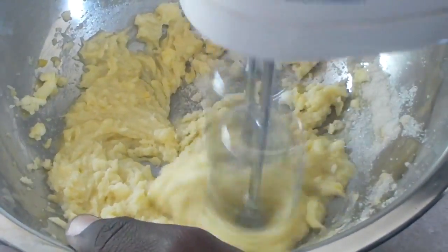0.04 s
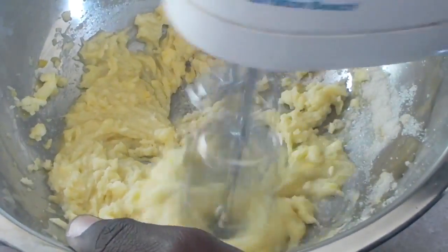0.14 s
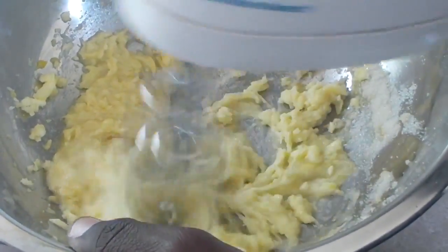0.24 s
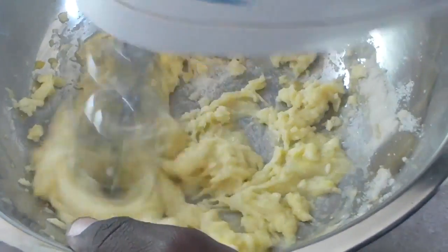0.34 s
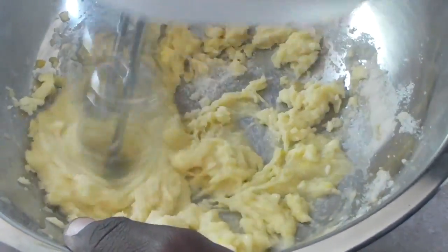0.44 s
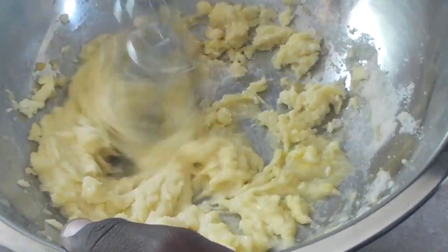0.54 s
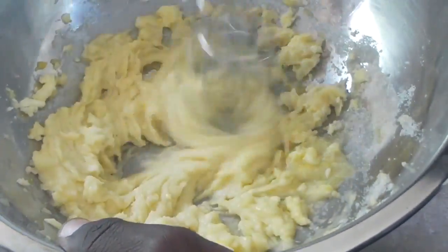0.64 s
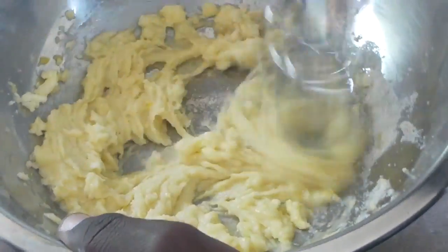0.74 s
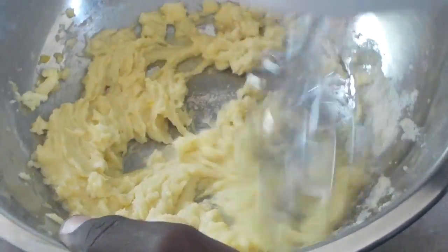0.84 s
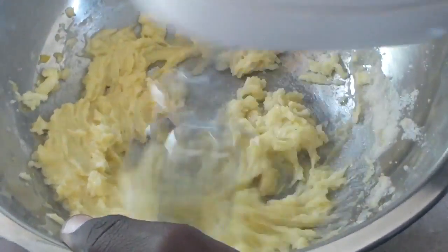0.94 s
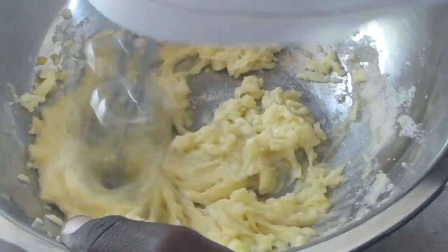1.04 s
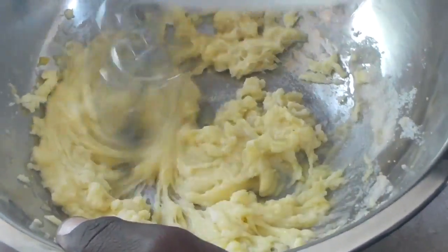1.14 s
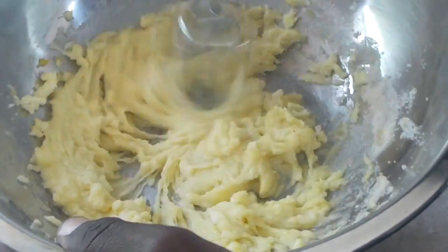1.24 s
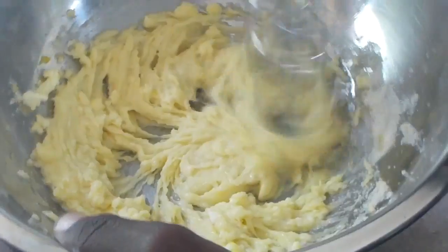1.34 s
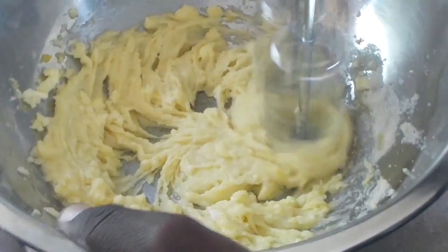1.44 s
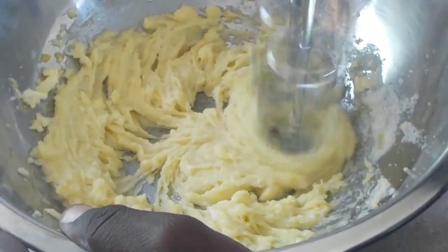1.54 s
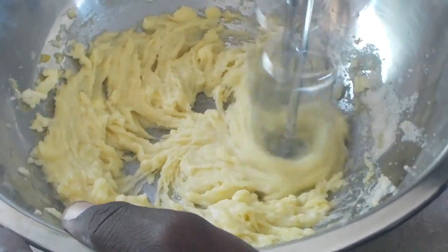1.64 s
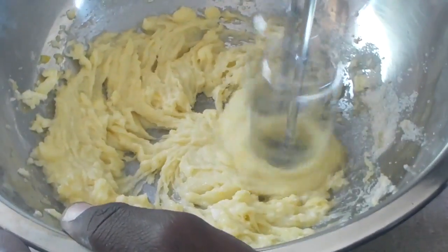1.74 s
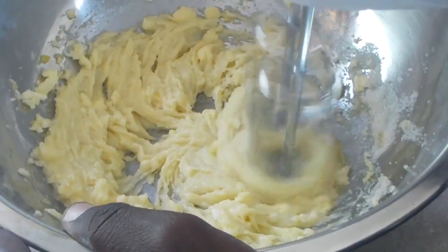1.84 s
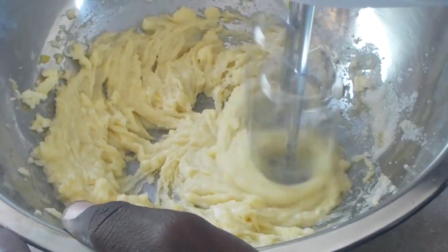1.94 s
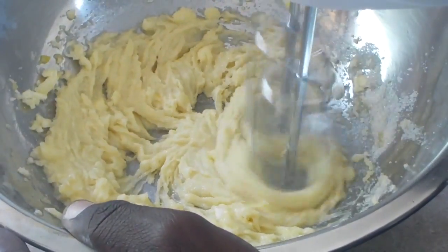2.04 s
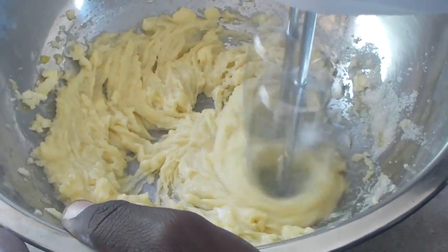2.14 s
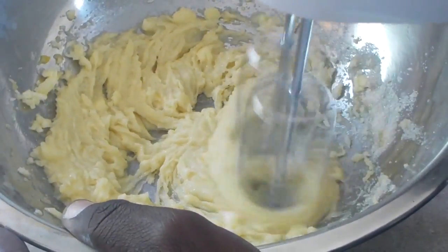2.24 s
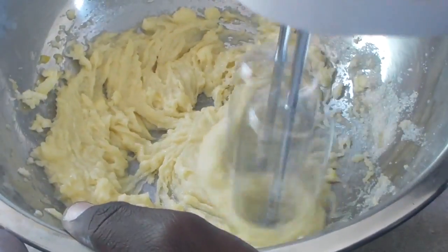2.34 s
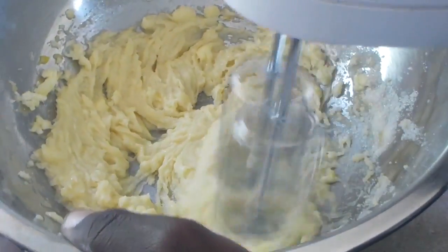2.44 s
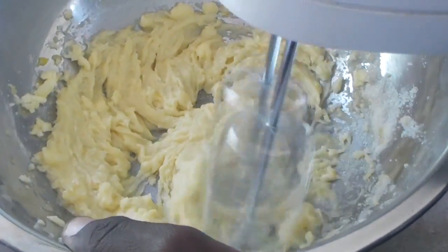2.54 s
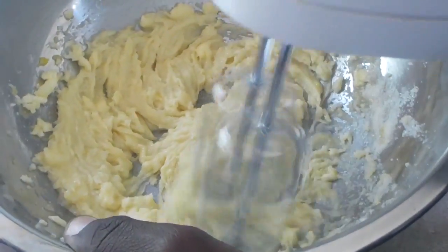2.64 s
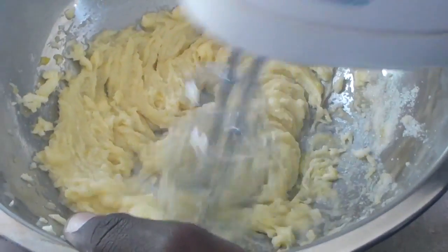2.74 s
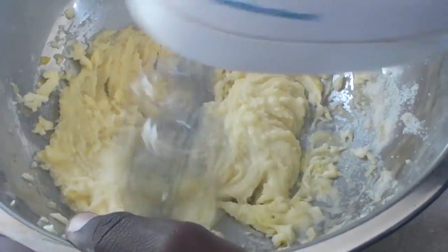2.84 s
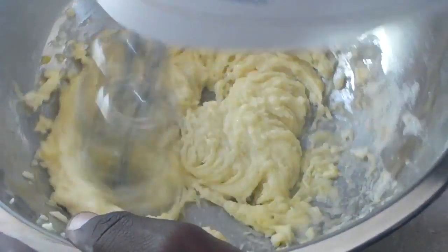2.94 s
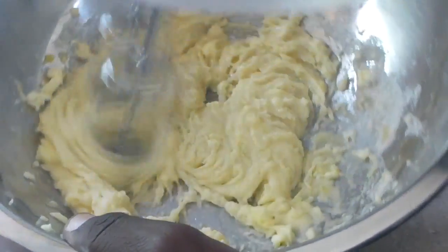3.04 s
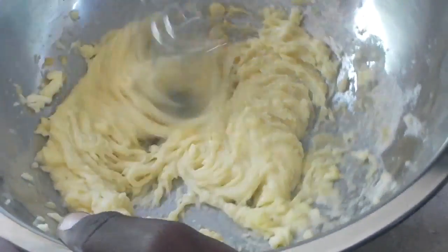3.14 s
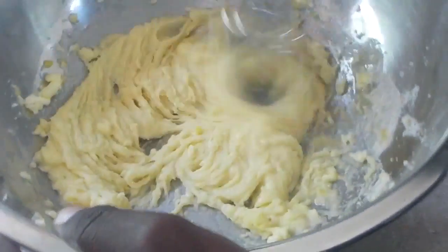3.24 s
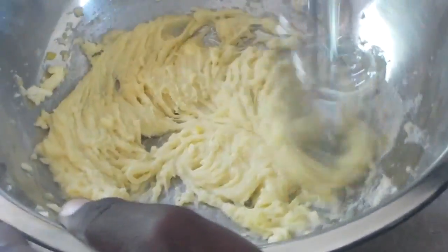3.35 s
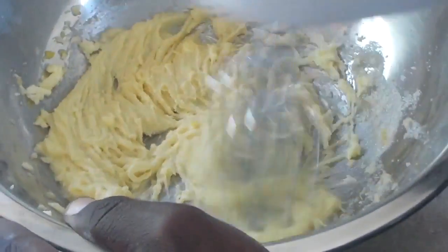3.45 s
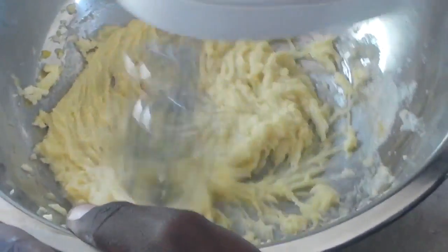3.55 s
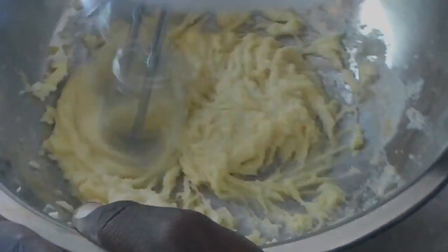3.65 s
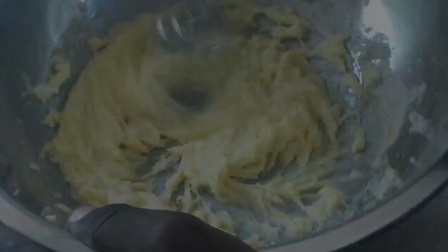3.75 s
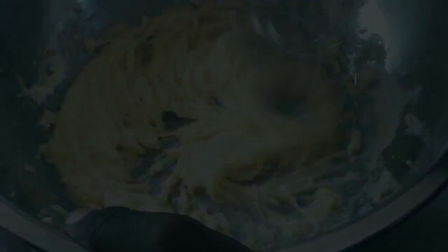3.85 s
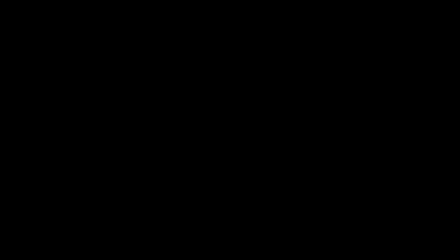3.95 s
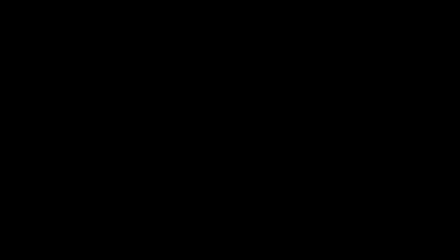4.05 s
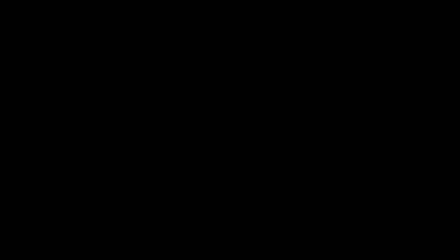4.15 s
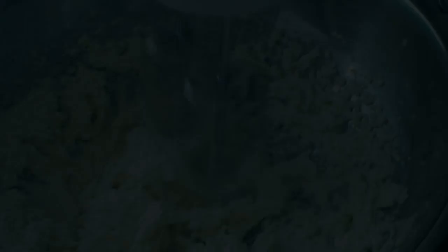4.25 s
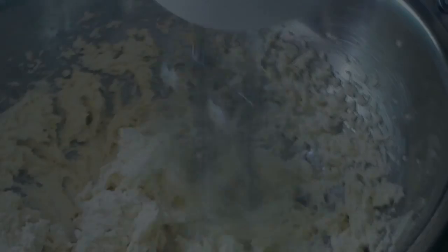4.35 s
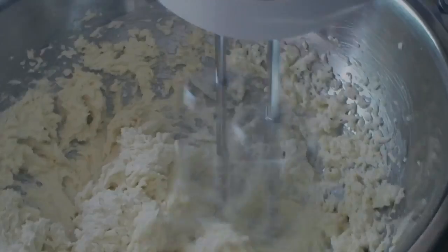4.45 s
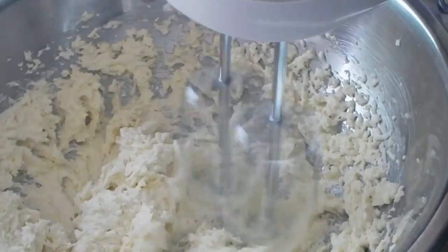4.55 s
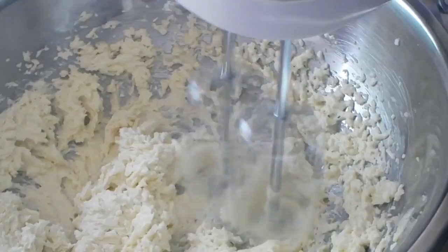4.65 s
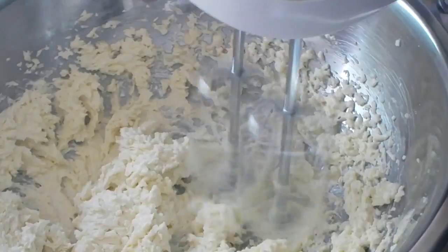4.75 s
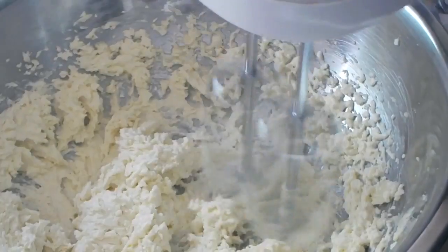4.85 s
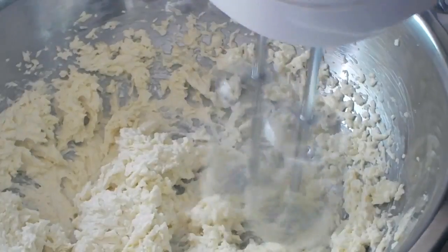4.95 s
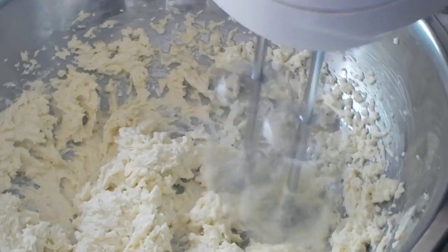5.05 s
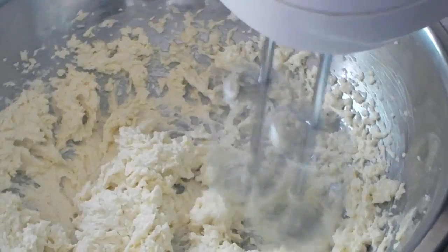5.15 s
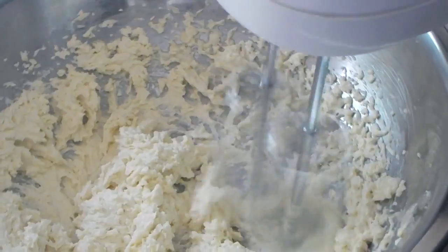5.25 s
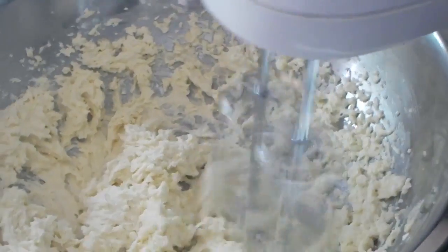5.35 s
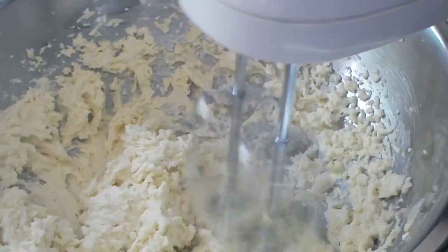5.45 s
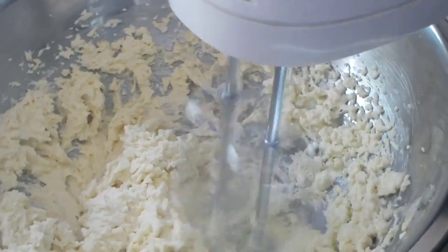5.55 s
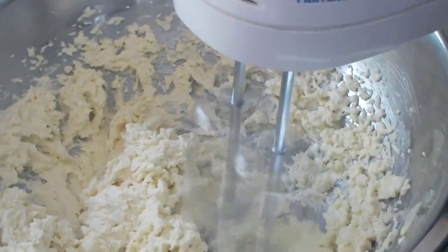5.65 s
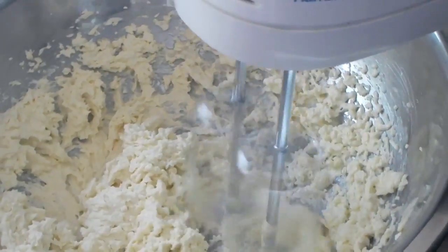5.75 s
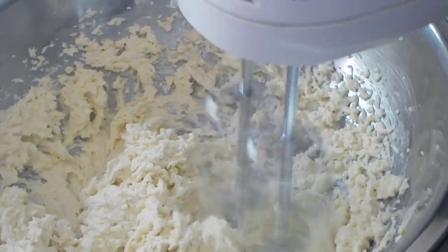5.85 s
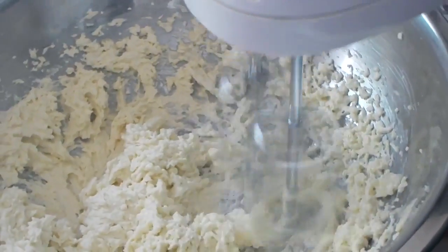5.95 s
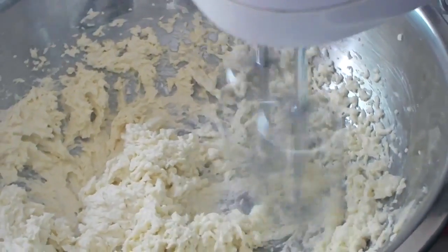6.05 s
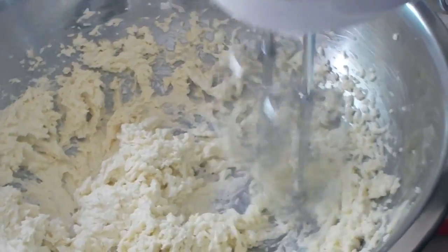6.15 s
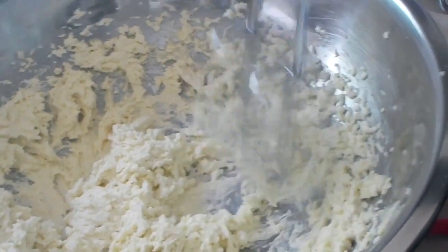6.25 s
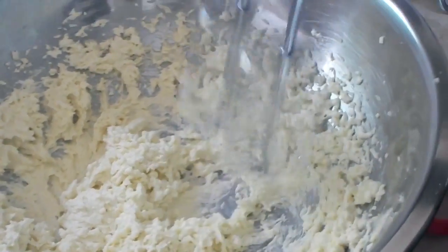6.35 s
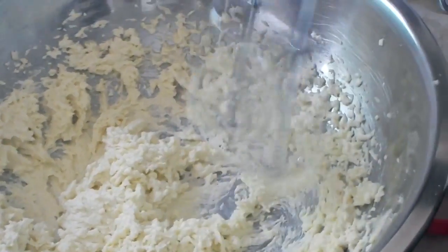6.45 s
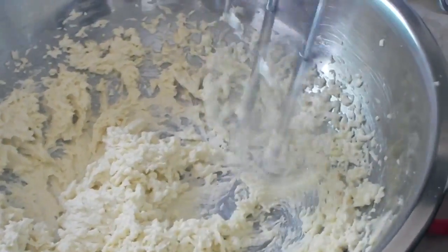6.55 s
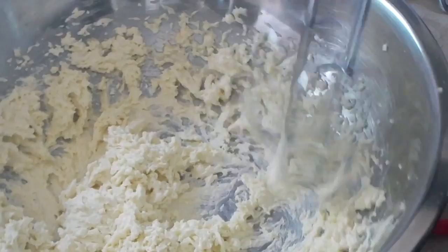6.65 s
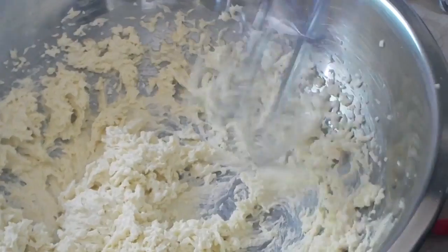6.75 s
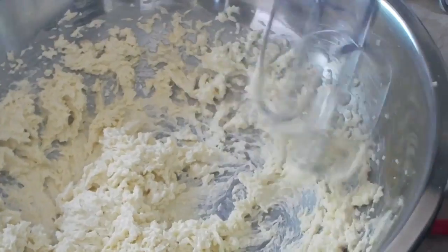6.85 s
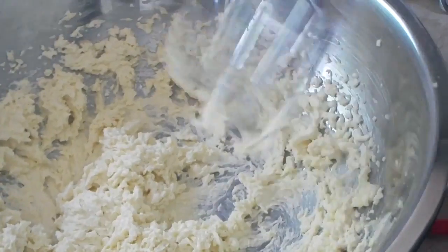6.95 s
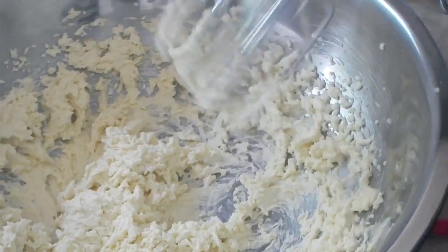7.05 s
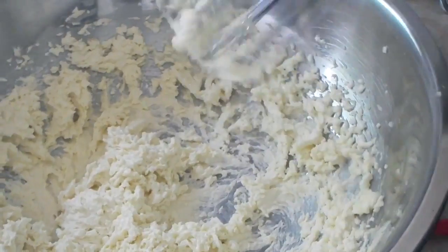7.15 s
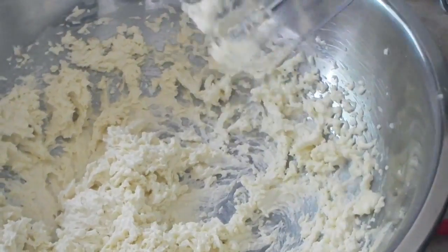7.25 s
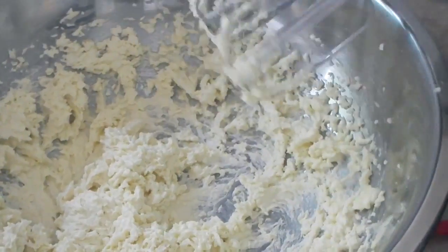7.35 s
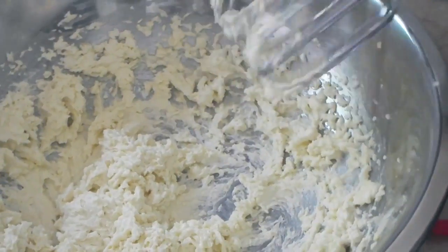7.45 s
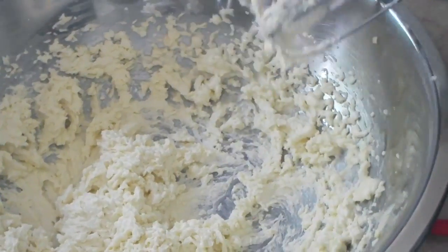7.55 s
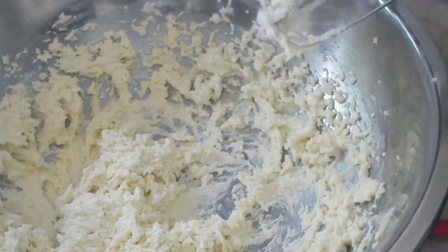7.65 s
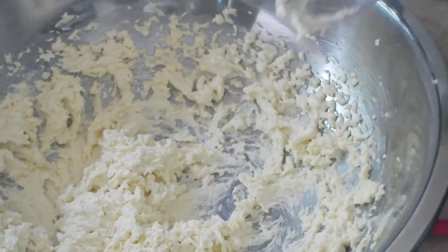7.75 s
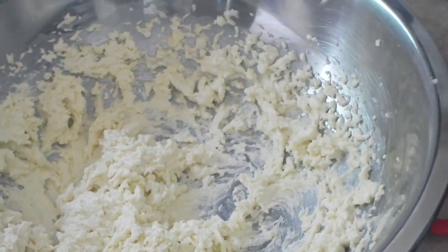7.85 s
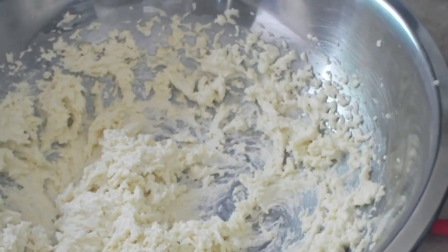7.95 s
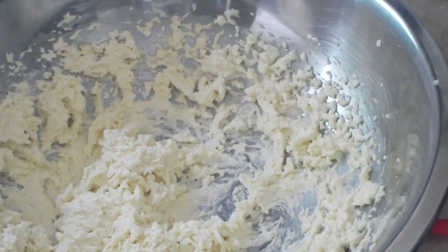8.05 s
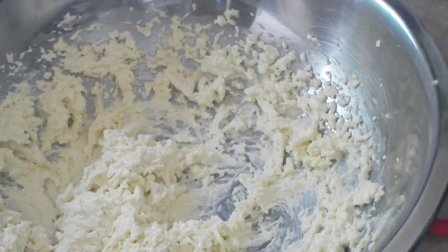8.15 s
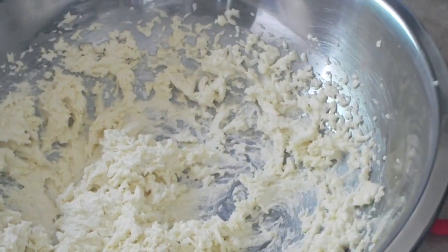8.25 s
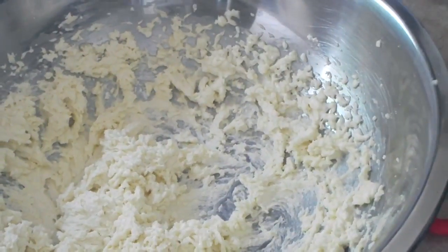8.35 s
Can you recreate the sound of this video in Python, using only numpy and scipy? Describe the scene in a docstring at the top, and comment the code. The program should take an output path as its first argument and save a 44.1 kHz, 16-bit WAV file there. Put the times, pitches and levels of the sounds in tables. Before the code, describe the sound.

An electric hand mixer beats dough in a steel bowl, speeds up, then winds down with a falling whine and clatters.

```python
"""An electric hand mixer works dough in a steel bowl, close to a small stereo microphone in a kitchen.
Its motor whines on multiples of the rotor rate, over a rush of air, gears and spattering dough.
First it runs slowly while the beaters rub and tick on the bowl and make it ring. Then it runs fast and
loud, is switched off, coasts down with a falling whine and clatters as it is laid aside."""
import sys
import numpy as np
from scipy import signal
from scipy.fft import rfft, irfft
from scipy.io import wavfile
from scipy.ndimage import uniform_filter1d

SR = 44100
rng = np.random.default_rng(int(sys.argv[2]) if len(sys.argv) > 2 else 0)


def master_out(mix):
    """Clip the mix to full scale and print it as 16-bit PCM to the path in sys.argv[1]."""
    frames = np.transpose(np.atleast_2d(mix))
    ceiling = np.clip(frames, -1, 1)
    pcm = np.round(ceiling * 32767).astype(np.int16)
    wavfile.write(sys.argv[1], SR, pcm)


N = 370881
TIME = np.arange(N) / SR
MAINS_PULL_HZ, SWITCH_OFF_S = 120, 5.78


def from_db(db):
    """Decibels to gain."""
    return np.exp(np.asarray(db) * (np.log(10) / 20))


def unit_rms(x):
    """Scale to an rms of one."""
    return x / np.sqrt(np.mean(x ** 2) + 1e-20)


def envelopes(rows):
    """One envelope per column, drawn through rows that begin with a time in seconds."""
    times, *columns = np.transpose(rows)
    return [np.interp(TIME, times, column) for column in columns]


def at_hz(curve, hz):
    """Read a curve on a log frequency axis."""
    freqs, values = np.transpose(curve)
    return np.interp(np.log(hz), np.log(freqs), values)


def drift(rate):
    """Smooth random modulation with an rms of one; a higher rate moves faster."""
    pole = np.exp(-80 * np.pi * rate / SR)
    slow = signal.lfilter([1], [1, -2 * pole, pole * pole], rng.standard_normal(N // 40 + 2002))[2000:]
    return np.interp(np.arange(N) / 40, np.arange(len(slow)), unit_rms(slow))


def resonate(x, hz, width_hz):
    """One resonance with unity gain at its peak."""
    r = np.exp(-np.pi * width_hz / SR)
    poles = [1, -2 * r * np.cos(2 * np.pi * hz / SR), r * r]
    return signal.lfilter(np.array([1, 0, -1]) * (1 - r * r) / 2, poles, x + 1e-18)


def resonate_twice(x, hz, width_hz, widen=1):
    """Two resonances in series, for steeper skirts."""
    return resonate(resonate(x, hz, width_hz), hz, widen * width_hz)


def pan(x, lean_db):
    """Place a sound lean_db louder on the left than on the right."""
    return np.array([x * from_db(lean_db / 2), x * from_db(-lean_db / 2)])


def fade(start, end, edge):
    """A gate open from start to end, with ramps of edge seconds."""
    return np.clip(np.minimum(TIME - start, end - TIME) / edge + .5, 0, 1)


def early_echoes(x, lean_db, echo_db):
    """Pan a sound and add the echoes of nearby surfaces, different on each side."""
    echoes = np.zeros((2, 2000))
    echoes[:, 60:] = rng.standard_normal((2, 1940)) * np.exp(-np.arange(1940) / SR / 0.01)
    echoes *= from_db(echo_db) / np.sqrt(np.sum(echoes ** 2, axis=1, keepdims=True))
    return pan(x, lean_db) + signal.fftconvolve(x[None], echoes, axes=1)[:, :N]


def mains_hum():
    """Faint, wavering mains hum in the kitchen."""
    return from_db(-48 + 3.6 * drift(4.8)) * np.sin(2 * np.pi * 2 * MAINS_PULL_HZ * TIME)


# Stereo width of the noise bed. Each row: frequency in Hz, left-right likeness from 0 to 1.
BED_LIKENESS = [(300, 0.98), (1000, 1), (2000, 0.97), (4500, 0.82), (7000, 0.7), (10000, 0.5)]
# Its balance. Each row: frequency in Hz, left minus right in dB.
BED_PAN = [(300, -1.5), (600, -6), (1200, -1.5), (2500, -1.5), (5000, -2), (9500, -2)]


def noise_bands():
    """Quarter-octave bands of stereo noise, wider towards the treble."""
    edges, white = 200 * 2 ** np.arange(0, 6.1, .25), rng.standard_normal((2, 2, N))
    for k, (low, high) in enumerate(zip(edges, edges[1:])):
        band = signal.butter(2, [low, high], "band", fs=SR, output="sos")
        mid, side = signal.sosfilt(band, white[k % 2])
        hz = np.sqrt(low * high)
        alike, lean = np.clip(at_hz(BED_LIKENESS, hz), 0, 1), from_db(at_hz(BED_PAN, hz) / 2)
        stereo = np.sqrt(1 + alike) * mid + np.sqrt(1 - alike) * side * [[1], [-1]]
        yield hz, stereo * [[lean], [1 / lean]]


# Passes along the bowl wall. Each row: middle and length in seconds, then relative levels in dB
# of low ring, high ring, rumble, hiss and sizzle.
WALL_PASSES = [(0.138, 0.13, -53, -29.5, -26.5, -34, -46), (0.215, 0.15, -23, -56, -27.5, -32, -66),
               (0.35, 0.16, -36.5, -63, -39, -40, -46), (0.551, 0.15, -47, -34.5, -26.5, -22.5, -44),
               (0.698, 0.13, -42, -39, -32.5, -31, -70), (0.868, 0.06, -28, -31.5, -30.5, -19.5, -53),
               (0.956, 0.12, -32.5, -61, -28, -24.5, -63), (1.143, 0.11, -49, -36.5, -26.5, -48, -75),
               (1.394, 0.19, -36.5, -36, -54, -56, -52), (1.811, 0.23, -63, -40, -28, -26, -53),
               (2.265, 0.18, -52, -36, -32, -21.5, -51), (2.477, 0.15, -29.5, -51, -23, -12, -42),
               (2.607, 0.083, -31, -55, -22.5, -39, -38.5), (2.726, 0.15, -47, -64, -22, -50, -59),
               (3.093, 0.14, -47, -32, -24, -43, -55), (3.293, 0.33, -34, -31.5, -26, -32, -47.5),
               (3.474, 0.13, -41, -56, -28, -45, -69), (3.737, 0.36, -59, -35, -26, -50, -51),
               (4.023, 0.11, -25.5, -49, -45, -49, -53)]


def pass_power():
    """The hand sweeps the beaters along the wall: the power of five layers swells, holds and sinks."""
    middle, length, *levels_db = np.transpose(WALL_PASSES)
    coarse = np.arange(0, N + 64, 64) / SR
    swells = np.exp(-((coarse - middle[:, None]) / (.5 * length[:, None])) ** 4)
    return np.array([np.interp(TIME, coarse, power) for power in from_db(levels_db) ** 2 @ swells])


def add_power(steady_db, power):
    """Level in dB of a steady layer with more power on top."""
    return 10 * np.log10(from_db(steady_db) ** 2 + power)


# Room tone of the kitchen. Each row: frequency in Hz, relative level in dB.
ROOM_EQ = [(250, -0.5), (550, -2.5), (900, 7.5), (1800, 1), (2700, -29), (4600, 1), (7000, -32),
           (10000, -9.5)]
# Steady rush of motor and gears. Each row: time in seconds, then rumble, hiss and sizzle in relative dB.
RUSH_LEVELS = [(0.0, -28.5, -29, -28), (0.1, -33.5, -18, -60), (0.8, -38, -30.5, -59),
               (1.25, -35, -45, -74), (1.55, -38, -31, -62), (2.0, -34, -31, -61), (2.4, -25, -18.5, -58),
               (2.95, -25.5, -17, -47), (3.45, -58, -23, -73), (3.85, -37, -26, -55),
               (4.0, -24.5, -23, -44), (4.51, -21.5, -15.5, -36.5), (5.55, -21, -15.5, -38.5),
               (6.14, -20, -17.5, -38.5), (6.6, -28.5, -30.5, -56), (6.69, -26.5, -31.5, -47),
               (6.76, -33, -40, -63), (7.29, -48, -50.5, -80)]
# Colour of the rush at slow and at fast speed. Each row: frequency in Hz, gain in dB.
SLOW_RUSH_EQ = [(250, -17), (500, -14.5), (900, -2.5), (1600, -2.5), (2200, -13), (3000, -76), (3800, -21),
                (4800, -13), (7200, -9.5), (10000, -4)]
FAST_RUSH_EQ = [(250, -4.5), (500, -1.5), (900, 0.5), (1600, 0.5), (2700, -1), (3800, -1), (4800, 6.5),
                (6000, -2), (7200, 0), (10000, -1.5)]


def rush_and_room():
    """Broad noise of air, gears and dough, patchy band by band, over the steady hush of the kitchen."""
    rumble_db, hiss_db, sizzle_db = add_power(envelopes(RUSH_LEVELS), pass_power()[2:])
    fast = fade(3.844, 99, 0.35)
    patchy_db = 2.7 - 2.2 * fast   # soft dough slaps unevenly, fast beating evens it out
    balance = pan(fade(-1, 8.8, 0.64), -3 + 4.2 * fast)
    shared_drift, out = drift(0.99), np.zeros((2, N))
    chatter_db = 1.14 * fast * drift(120)   # the gears chatter finely at high speed
    for hz, noise in noise_bands():
        level_db = rumble_db + 8.5 if hz < 2400 else hiss_db + 7.5 if hz < 8000 else sizzle_db + 22
        colour_db = (1 - fast) * at_hz(SLOW_RUSH_EQ, hz) + fast * at_hz(FAST_RUSH_EQ, hz)
        patches_db = patchy_db * (.5 * shared_drift + 1.5 * drift(11.5))
        band_db = level_db + colour_db + patches_db + chatter_db * (hz > 3000)
        rush = balance[:, ::8] * from_db(band_db[::8])
        hush = from_db(at_hz(ROOM_EQ, hz) - 35.5)
        out += np.repeat(np.hypot(rush, hush), 8, axis=1)[:, :N] * noise
    return out


def dough_spatter(per_s, level_db):
    """Wet dough spatters in clumps of small bursts, thickest when the sizzle swells."""
    sizzle_db = add_power(envelopes(RUSH_LEVELS)[2], pass_power()[4])
    density = from_db(6 * drift(9) + .6 * (np.clip(sizzle_db, -62, -45) + 55))
    onsets = rng.random((2, N)) < per_s * density / SR
    accent_db = 6.75 * np.minimum(rng.exponential(1, (2, N)), 3.5)
    sizes = from_db(level_db + accent_db + [[-6], [0]])   # softer on the left
    decay = np.exp(-1 / (.003 * SR))
    bursts = signal.lfilter([1], [1, -decay], onsets * sizes * fade(-1, 4.46, 0.15) + 1e-18)
    return resonate_twice(bursts * rng.standard_normal((2, N)), hz=10100, width_hz=2200)


# Bright ticks. Each row: start in seconds, relative level in dB, left minus right in dB.
BEATER_TICKS = [(0.0358, -24.5, -11), (0.343, -37, -15), (0.8609, -38, 7), (0.9522, -39, 17),
                (1.2965, -47, -20.5), (1.354, -42, -25), (1.4085, -39, 10), (1.57, -39, -10),
                (1.619, -36, 0.5), (1.637, -27.5, 9), (1.777, -38, -22), (1.9617, -34.5, -27),
                (2.005, -38, -19), (2.1015, -36, -8), (2.112, -35, -24), (2.138, -42, -23),
                (2.406, -38, -7.0), (2.477, -31, 1.5), (2.5763, -34.5, -15), (3.109, -39, -17),
                (3.1985, -39, -1), (3.2809, -40, 0), (3.477, -40, -9), (4.121, -39, -5.5), (4.46, -39, 6),
                (4.551, -36, -9), (5.0275, -38, -12), (5.5767, -37, -6), (8.218, -42.5, 2)]


def beater_ticks():
    """A tiny ping with a bright tail; while the power is on, it repeats one mains pull later."""
    out, t = np.zeros((2, N + 2000)), np.arange(2000) / SR
    noises, chance = rng.standard_normal((len(BEATER_TICKS), 2, 2000)), rng.random((len(BEATER_TICKS), 2))
    for (start, db, lean_db), noise, (pitch, repeat) in zip(BEATER_TICKS, noises, chance):
        hz, at = 10400 + 900 * pitch, int(start * SR)
        ping = np.sin(2 * np.pi * hz * t) * np.exp(-t / 0.00036) * (1 - np.exp(-t / 0.00012))
        ping += 0.8 * repeat * (start < SWITCH_OFF_S) * np.roll(ping, SR // MAINS_PULL_HZ)
        tail = 0.15 * resonate(noise, hz, 1300) * np.exp(-t / 0.018)
        out[:, at:at + 2000] += from_db(db + 42) * (pan(ping, lean_db) + tail)
    return out[:, :N]


# Wire drags. Each row: middle in seconds, length in seconds, level in dB, pitch in Hz.
WIRE_DRAGS = [(0.13, 0.1, -35, 3900), (0.195, 0.096, -27, 6500), (0.283, 0.043, -35, 4640),
              (0.585, 0.063, -26, 4350), (0.85, 0.038, -27, 5800), (0.906, 0.1, -27, 6780),
              (1.112, 0.069, -21, 4560), (1.203, 0.11, -23.5, 4690), (1.33, 0.068, -44, 5460),
              (1.467, 0.09, -29, 4650), (1.799, 0.093, -37, 7020), (1.87, 0.067, -37, 6700),
              (2.25, 0.1, -27.5, 6020), (2.25, 0.21, -32, 4750), (2.381, 0.13, -21.5, 4860),
              (3.098, 0.21, -25, 4640), (3.43, 0.055, -27, 6700), (3.658, 0.08, -22, 4530)]


def wire_swishes():
    """A wire drags grittily along the wall and sings in one high mode of the bowl."""
    out, offsets = np.zeros(N), np.arange(-5000, 7000)
    t, grit = offsets / SR, from_db(3.7 * drift(65))
    for (middle, length, db, hz), noise in zip(WIRE_DRAGS, rng.standard_normal((len(WIRE_DRAGS), len(t)))):
        at = int(middle * SR) + offsets
        swish = unit_rms(resonate_twice(noise * grit[at], hz, width_hz=180))
        out[at] += from_db(db) * swish * np.exp(-(t / (.5 * length)) ** 4)
    return out


def tone_bursts(events, tail_stretch, gain_db=0):
    """Each tone swells, then rings out a little; a weaker tone nearby roughens it."""
    out, offsets = np.zeros(N), np.arange(-1500, 2500)
    t = offsets / SR
    for (peak_s, db, length, hz), (phase, detune) in zip(events, rng.random((len(events), 2))):
        swell = np.exp(-(t / (0.41 * length * np.where(t > 0, tail_stretch, 1))) ** 2)
        tone = np.sin(2 * np.pi * (hz * t + phase))
        tone += .18 * np.sin(2 * np.pi * hz * (.85 + .3 * detune) * t)
        at = int(peak_s * SR) + offsets
        out[at[at >= 0]] += (from_db(db + gain_db) * swell * tone)[at >= 0]
    return out


def small_catches(drag_db, scatter_db, length_s, low_hz, high_hz, tail_stretch):
    """While a beater drags, blade after blade catches, each as hard as the drag allows."""
    blade_gap_s = 0.014
    late, span, pitch = rng.random((330, 3)).T
    times = (np.arange(len(late)) + 0.45 * late) * blade_gap_s
    db = drag_db[(times * SR).astype(int)] + scatter_db * rng.standard_normal(len(times))
    lengths, hz = length_s * 4 ** (span - .5), low_hz + (high_hz - low_hz) * pitch
    return tone_bursts(np.transpose([times, db, lengths, hz]), tail_stretch)


# Low and high modes of the bowl. Each row: pitch in Hz, width in Hz, gain in dB.
LOW_MODES = [(1008.6, 28, 1), (1137, 84, 2.5), (1587, 69, 1), (1758, 100, -4.5), (614.8, 30, -3.5),
             (915, 79, -12), (1863, 45, 1), (1944, 50, -11)]
HIGH_MODES = [(4617, 500, 2), (3840, 128, -2.5), (4990, 540, -6), (5670, 85, 0), (6210, 390, -15),
              (6820, 830, -11.5)]
# Wire clinks. Each row: peak time in seconds, relative level in dB, length in seconds, pitch in Hz.
WIRE_CLINKS = [(0.11, -15, 0.0068, 5870), (0.235, -20, 0.0062, 6430), (0.63, -27, 0.0067, 7000),
               (0.2212, -17, 0.008, 5470), (0.5674, -12, 0.0028, 4330), (0.6931, -4, 0.003, 4520),
               (0.8288, -17, 0.005, 5570), (0.8439, -11, 0.0041, 5030), (0.8559, -5, 0.0014, 5050),
               (0.9275, -15.5, 0.0037, 7150), (1.1294, -17, 0.0093, 4720), (1.1641, -11, 0.0063, 4730),
               (1.1715, -10, 0.0059, 4810), (1.1866, -11, 0.0035, 4740), (1.4093, -10, 0.00082, 4940),
               (2.3642, -12, 0.0055, 5250), (3.0806, -28, 0.0035, 4900), (3.106, -13.5, 0.0045, 4760),
               (3.325, -11, 0.0023, 4970)]


def steel_bowl():
    """Dragging beaters shake the bowl, which answers in its modes; catches and clinks stand out."""
    ring_power = pass_power()[:2]
    low_db, high_db = add_power([[-50.5], [-37.5]], ring_power)   # a light graze between passes
    touching = fade(-1, 4.33, 0.13)   # in the stiffer dough the beaters stay off the wall
    through_dough = (1 - touching) * from_db(envelopes(RUSH_LEVELS)[0] + 12.5)   # motor shake
    low = touching * from_db(0.26 * low_db - 9 + 1.7 * drift(27)) + through_dough
    high = touching * from_db(high_db + 20.5 + 1.5 * drift(43))
    high += through_dough * from_db(-4.5) * fade(-1, 7.4, .4)
    out = tone_bursts(WIRE_CLINKS, tail_stretch=2, gain_db=3) + wire_swishes()
    out += small_catches(low_db + 7, 2.5, length_s=.008, low_hz=1200, high_hz=1350, tail_stretch=1.3)
    out += small_catches(high_db + 10, 4, length_s=.002, low_hz=4400, high_hz=5800, tail_stretch=1.2)
    scrape = np.sqrt(ring_power[0]) * rng.standard_normal(N)
    out += from_db(20) * resonate_twice(scrape, hz=1240, width_hz=110)   # only passes wake this mode
    for drive, modes, damping_db in ((low, LOW_MODES, 2.5), (high, HIGH_MODES, 5)):
        shake = drive * rng.standard_normal(N)
        for hz, width_hz, db in modes:   # each comes and goes as dough damps another patch of wall
            out += from_db(db + damping_db * drift(4.4)) * resonate_twice(shake, hz, width_hz, widen=1.1)
    return out


# Brief ringing tones. Each row: peak time in seconds, level in dB, length in seconds, pitch in Hz.
SHORT_RINGS = [(0.142, -17, 0.02, 1324), (0.177, -13, 0.014, 1270), (0.2225, -12.5, 0.0072, 1250),
               (0.2356, -7, 0.009, 1250), (0.2591, -12, 0.0038, 1190), (0.2883, -12, 0.0046, 1340),
               (0.3242, -15.5, 0.0062, 1280), (0.3371, -13.5, 0.0094, 1263), (0.535, -20, 0.013, 1150),
               (0.5686, -10.5, 0.023, 1184), (0.8628, -9.5, 0.0062, 1250), (0.875, -12, 0.0076, 1250),
               (0.888, -14, 0.0044, 1290), (0.911, -14.5, 0.017, 1347), (0.9362, -11, 0.028, 1264),
               (0.9517, -2.5, 0.0059, 1240), (0.965, -14, 0.0068, 1255), (0.977, -16, 0.0087, 1280),
               (0.992, -21, 0.0075, 1240), (1.2797, -20, 0.011, 1610), (2.4995, -10, 0.012, 1270),
               (2.5611, -7, 0.0057, 1240), (2.5806, -8, 0.016, 1280), (2.6149, -9.5, 0.01, 1290),
               (2.629, -9, 0.0066, 1270), (2.656, -12.5, 0.021, 1263), (2.6627, -8, 0.0054, 1240),
               (2.71, -13, 0.0068, 1230), (2.7216, -8.5, 0.013, 1306), (2.7359, -8, 0.009, 1280),
               (2.7747, -12, 0.025, 1164), (2.7915, -8, 0.032, 1257), (2.806, -6, 0.014, 1252),
               (3.0107, -18, 0.012, 748), (3.045, -22.5, 0.037, 712), (3.112, -22.5, 0.047, 1210),
               (3.1869, -9, 0.0025, 1550), (3.195, -18, 0.045, 1212), (3.2593, -14, 0.018, 1317),
               (3.3162, -11, 0.0054, 1230), (3.3313, -13.5, 0.016, 1310), (3.352, -16.5, 0.01, 1200),
               (3.367, -22, 0.0082, 1190), (3.8932, -18, 0.015, 1360), (4.0211, -15, 0.0079, 1230),
               (4.578, -18, 0.006, 1530), (4.714, -18, 0.0057, 1580), (4.749, -18, 0.0071, 1620),
               (4.998, -13.5, 0.017, 1260), (5.0397, -12, 0.0052, 1270), (5.04, -18, 0.013, 1550),
               (5.1, -16, 0.015, 1280), (5.176, -15, 0.005, 1670), (5.195, -11, 0.0037, 700),
               (5.256, -14, 0.0047, 1230), (5.272, -20, 0.051, 1273), (5.365, -12.5, 0.0047, 1270),
               (5.412, -17, 0.014, 1210), (5.3805, -9, 0.0045, 700), (5.871, -28, 0.0074, 1400),
               (6.063, -15, 0.0056, 1070), (6.107, -18, 0.0069, 1530), (6.1999, -13, 0.008, 680),
               (6.7058, -12, 0.0086, 1270)]


def short_rings():
    """Brief ringing tones: bowl rings at slow speed, short pitched blips in the fast rush."""
    return tone_bursts(SHORT_RINGS, tail_stretch=1.4)


# Modes of the free beater wires. Each row: pitch in Hz, relative level in dB, t60 in seconds.
WIRE_MODES = [(3530, -2, 0.22), (4620, -7, 0.39), (5000, 6, 0.12), (5710, -6.5, 0.52), (6430, -7.5, 0.36),
              (6800, -14, 0.15)]
# The mixer lifted out and laid aside. Each row: start in seconds, relative level in dB,
# thud t60 in seconds, clink trim in dB, clink pitch in Hz.
KNOCKS = [(6.676, -10.5, 0.047, -1, 6480), (6.704, -13, 0.1, -2.5, 4750), (7.341, -21, 0.088, -30, 5000),
          (7.354, -20, 0.2, 13.5, 4980), (7.368, -14, 0.32, 5, 5060), (7.379, -7.5, 0.13, 1, 5100),
          (7.391, -2.5, 0.16, -20, 4900), (7.399, -3.5, 0.081, -14.5, 3430), (7.42, -16.5, 0.2, -3, 5700),
          (7.431, -10, 0.13, -9, 6100), (7.479, -10, 0.094, -1.5, 5600), (7.491, -18, 0.15, -10, 5630),
          (7.56, -17, 0.085, -5.5, 6400), (7.567, -30, 0.53, 13.5, 4640), (7.587, -34, 0.14, 9, 4440),
          (8.187, -15.5, 0.17, -18, 7000), (8.198, -40.5, 0.091, -28, 4550),
          (8.215, -13.5, 0.019, -9.5, 6700), (8.22, -24, 0.34, 4, 4600), (8.343, -29.5, 0.32, 12.5, 6600)]


def clatter():
    """Each knock is a dull thud of the casing and a rough clink that leaves the beater wires ringing."""
    size, reach_hz = 9000, 1100   # a knock wakes mostly the modes this near its clink
    out, t = np.zeros(N + size), np.arange(size) / SR
    casing = signal.butter(2, [450, 1800], "band", fs=SR, output="sos")
    wires = signal.butter(2, [3400, 7500], "band", fs=SR, output="sos")
    modes_hz, modes_db, modes_t60 = np.transpose(WIRE_MODES)[:, :, None]
    chance = rng.standard_normal((len(KNOCKS), 2, len(WIRE_MODES), 1))
    noises = rng.standard_normal((len(KNOCKS), 2, size))
    for (start, db, t60, trim_db, hz), (dull, bright), (accent, detune) in zip(KNOCKS, noises, chance):
        thud = unit_rms(signal.sosfilt(casing, dull))
        thud *= from_db(-60 * t / max(t60, .02)) * (1 - np.exp(-t / 0.0018))
        buzz = 15 * uniform_filter1d(rng.standard_normal((len(WIRE_MODES), size)), 220)   # dough on wires
        distance = np.minimum(np.abs(modes_hz - hz) / reach_hz, 1.2)
        ring_db = modes_db - 12.5 + 3 * accent - 9 * distance - 60 * t / modes_t60
        partials = np.sin(2 * np.pi * modes_hz * (1 + 0.0037 * detune) * t)
        ring = np.sum(buzz * from_db(ring_db) * partials, axis=0)
        ping = np.sin(2 * np.pi * hz * t) * np.exp(-t / 0.0048)
        rasp = 0.22 * unit_rms(resonate(bright, hz, 450)) * np.exp(-t / 0.01)
        snap = 0.4 * bright * np.exp(-t / 0.00071)
        fizz = 0.15 * signal.sosfilt(wires, bright) * np.exp(-t / 0.019)
        clink = (ring + ping + rasp + snap + fizz) * (1 - np.exp(-t / 0.00034))
        at = int(start * SR)
        out[at:at + size] += from_db(db - 7.5) * thud + from_db(db + trim_db + 1) * clink
    return out[:N]


# Rotor speed, slow setting and fast setting with the coast. Each row: time in seconds, turns per second.
SLOW_ROTOR = [(0, 224), (.15, 229), (.55, 228.4), (.68, 226.5), (.95, 231.7), (1.4, 230.9), (1.62, 239),
              (2.1, 240.6), (2.3, 248), (2.45, 273), (2.65, 295), (2.85, 304), (2.95, 305.5), (3.25, 303.6),
              (3.65, 311), (3.95, 312)]
FAST_ROTOR = [(3.9, 358.5), (4.2, 357.5), (4.65, 366.3), (4.95, 371), (5.2, 373), (5.45, 371.8),
              (5.76, 371), (5.85, 353.7), (5.95, 329.6), (6.25, 240), (6.45, 190), (6.55, 172), (6.75, 132),
              (6.95, 100), (7.2, 72)]
# Multiples of the rotor rate: fan blades, commutator bars, two of unbalance, an overtone of the bars.
ROTOR_ORDERS = [10, 12, 2, 3, 36]
# Mix of the whine. Each row: time in seconds, then a level in dB per order (fast: the first three only).
SLOW_WHINE = [(0, -77, -38, -70, -73, -44), (.4, -68, -47, -44, -47, -45), (.9, -63, -64, -55, -59, -33),
              (1.3, -65, -46, -49, -69, -37), (1.8, -72, -41, -52.5, -37, -40),
              (2.2, -60, -42, -71, -41.5, -49), (2.45, -44, -61, -42, -54, -70),
              (2.9, -74, -61, -36, -30.5, -70), (3.3, -46, -59, -42.5, -54, -70),
              (3.65, -36, -34, -34.5, -36, -70), (3.95, -57, -58, -37.5, -46, -70)]
FAST_WHINE = [(3.9, -33, -36, -38), (4.3, -15, -17, -38), (4.55, -16, -19, -35), (4.7, -12.5, -14, -28),
              (5.2, -11.5, -14, -25.5), (5.75, -11, -16, -25), (5.87, -16, -24, -27), (6.0, -9, -25, -23),
              (6.12, -24, -34, -28), (6.48, -22, -52, -55), (6.62, -38, -60, -66), (6.88, -37, -63, -66),
              (7.2, -55, -70, -70)]


def motor(speed, whine, companions, throb_depth, waver_db):
    """Tones on multiples of the rotor rate; the mains pull throbs them, the load makes them waver."""
    turns_per_s = envelopes(speed)[0] * (1 + 0.0009 * drift(26))
    angle = 2 * np.pi * np.cumsum(turns_per_s) / SR
    throb = 1 + throb_depth * np.sin(2 * np.pi * MAINS_PULL_HZ * TIME)
    waver_db = waver_db + .5 * fade(SWITCH_OFF_S, 99, .2)   # loose gears flutter once coasting
    shudder_db = 12 * fade(SWITCH_OFF_S + .38, 99, .25)   # and the unbalance shakes the casing harder
    levels_db, out = envelopes(whine), np.zeros(N)
    for order, db in zip(ROTOR_ORDERS, levels_db):
        out += from_db(db + waver_db * drift(13)) * np.sin(order * angle)
    for order, db in companions:   # further orders that ride on the first unbalance tone's level
        out += from_db(levels_db[2] + db + shudder_db + waver_db * drift(1.7)) * np.sin(order * angle)
    return out * throb * fade(speed[0][0] - .05, speed[-1][0], .15)


def scene():
    """Mixer, bowl and kitchen together, in stereo."""
    whine = motor(SLOW_ROTOR, SLOW_WHINE, companions=[(4, 1), (5, -4)], throb_depth=.44, waver_db=3.5)
    whine += motor(FAST_ROTOR, FAST_WHINE, companions=[(1, -8)], throb_depth=.1, waver_db=1.3)
    mix = early_echoes(whine + short_rings(), lean_db=-.8, echo_db=-16)
    mix += early_echoes(steel_bowl(), lean_db=-2.2, echo_db=-5.5)
    mix += early_echoes(clatter(), lean_db=-2, echo_db=-10)
    return mix + beater_ticks() + dough_spatter(per_s=82, level_db=-26.5) + rush_and_room() + mains_hum()


# Overall tone colour. Each row: frequency in Hz, gain in dB.
MASTER_EQ = [(120, -35), (240, -34.5), (450, -5.5), (720, -0.5), (2000, -0.5), (2250, -13), (2750, -15),
             (3500, -10.5), (7100, -6), (7700, -27), (8400, -27.5), (10700, -18.5), (11300, -22.5),
             (12200, -40)]
# Narrow gaps in the sound's spectrum. Each row: centre in Hz, half width in Hz, gain in dB.
SPECTRAL_NOTCHES = [(2418, 124, -24), (2999, 96, -17.5), (4960, 55, -10.5), (7960, 168, -53)]


def record(dry):
    """Colour and notch the mix, round its peaks and cut the bottom and top."""
    size, top_hz = 2 ** 13, 12247
    hz = np.maximum(np.fft.rfftfreq(size, 1 / SR), 1)
    notches_db = sum(db * np.exp(-((hz - centre) / half) ** 2) for centre, half, db in SPECTRAL_NOTCHES)
    cepstrum = irfft(np.log(from_db(at_hz(MASTER_EQ, hz) + notches_db)))
    cepstrum[1:size // 2] *= 2   # folding the cepstrum gives minimum phase
    response = irfft(np.exp(rfft(cepstrum[:size // 2 + 1], size)))
    coloured = signal.fftconvolve(dry, response[None], axes=1)[:, :N]
    rounded = 1.795 * np.tanh(coloured / 1.986)
    thinned = signal.lfilter(*signal.butter(2, 190, "high", fs=SR), rounded)
    return signal.sosfilt(signal.cheby2(12, 70, top_hz, fs=SR, output="sos"), thinned)


dry = scene()
out = record(dry)
master_out(out)
```